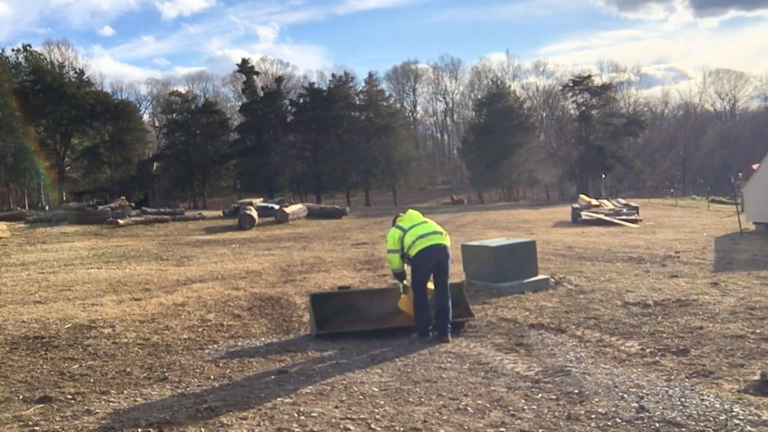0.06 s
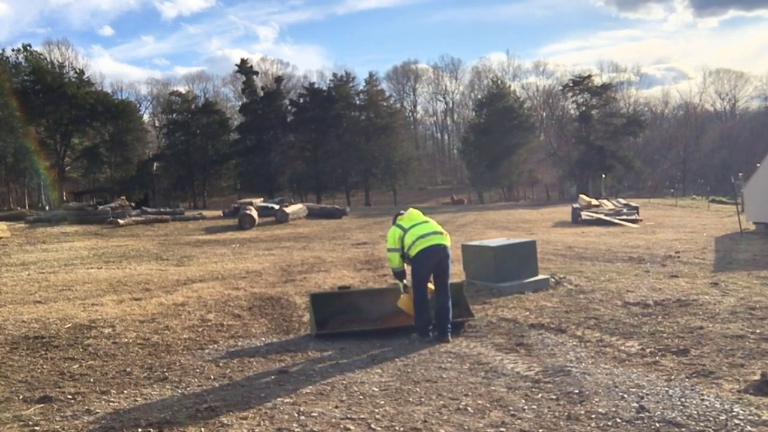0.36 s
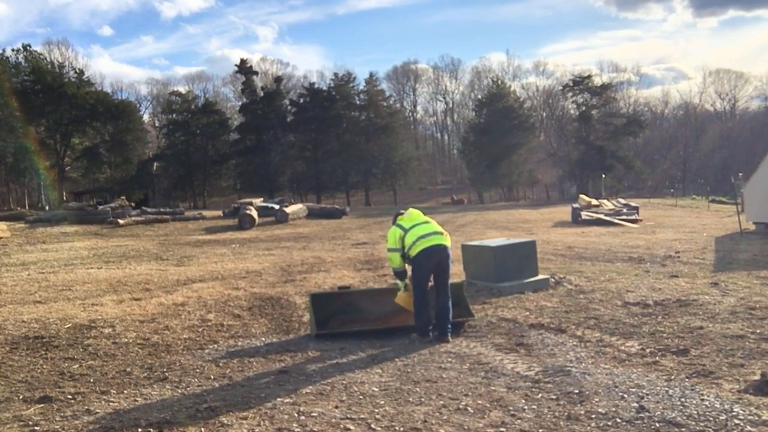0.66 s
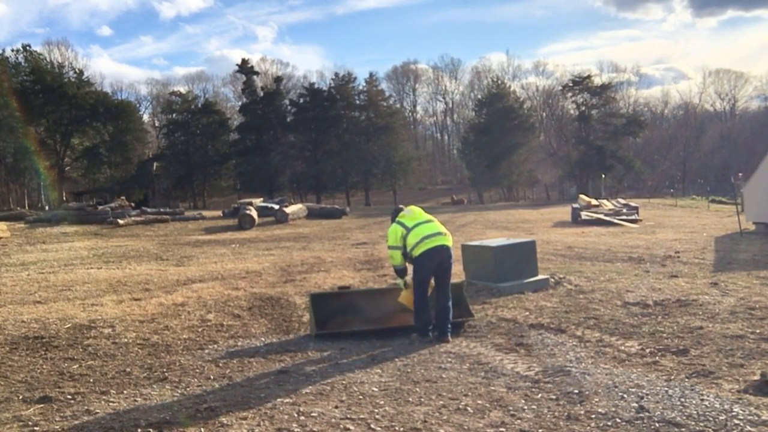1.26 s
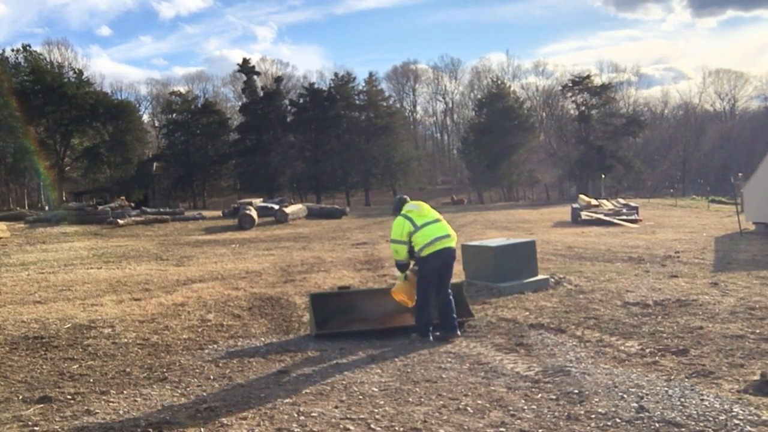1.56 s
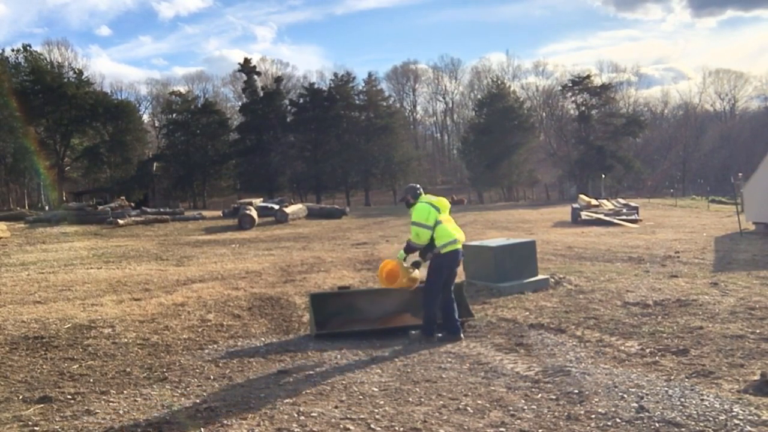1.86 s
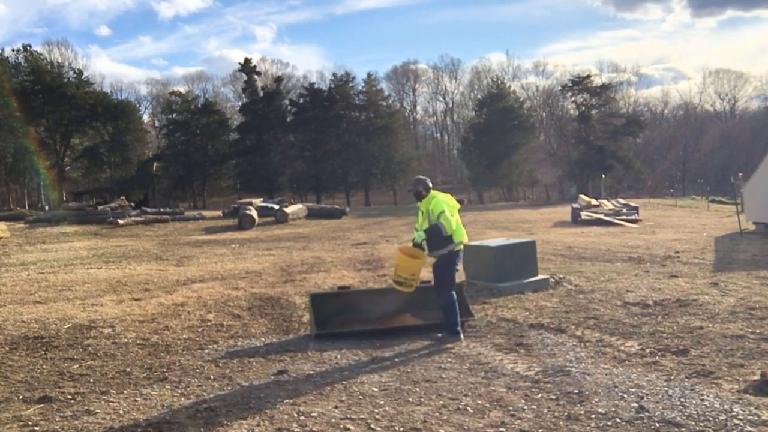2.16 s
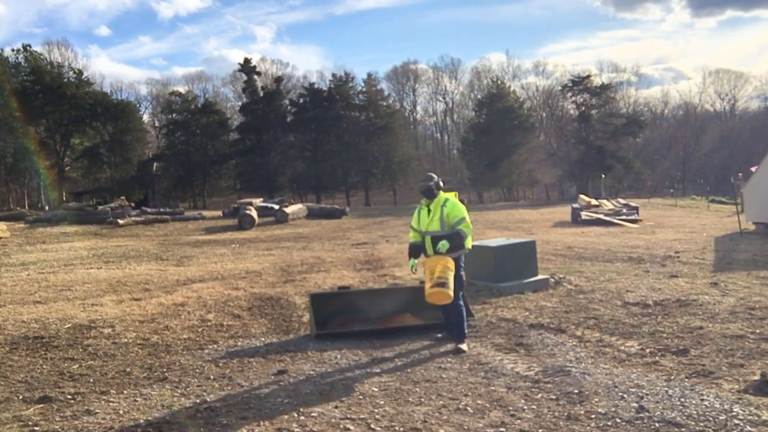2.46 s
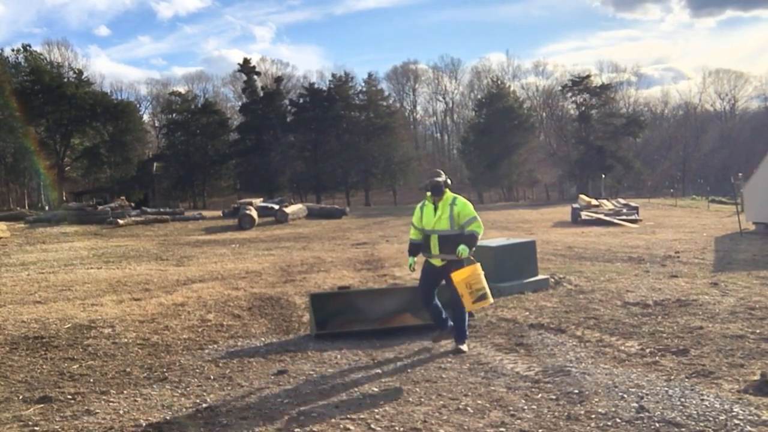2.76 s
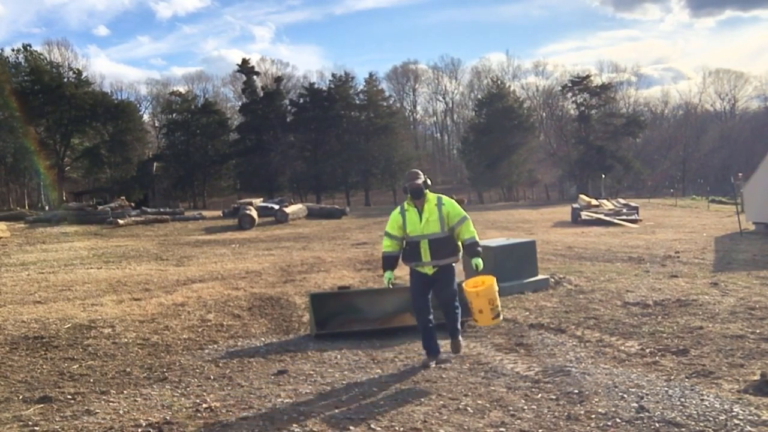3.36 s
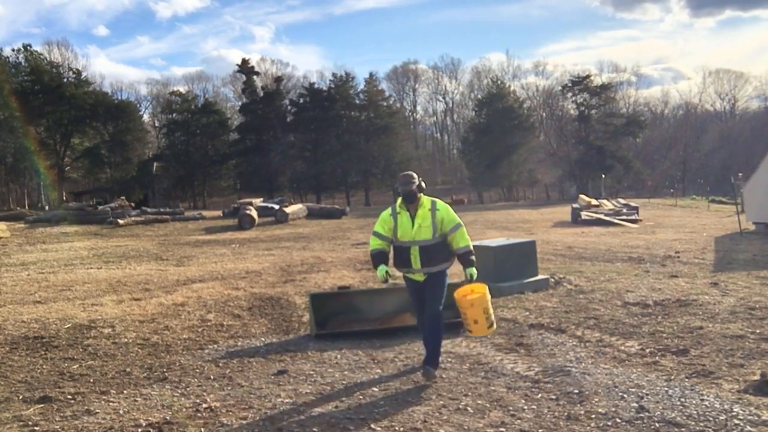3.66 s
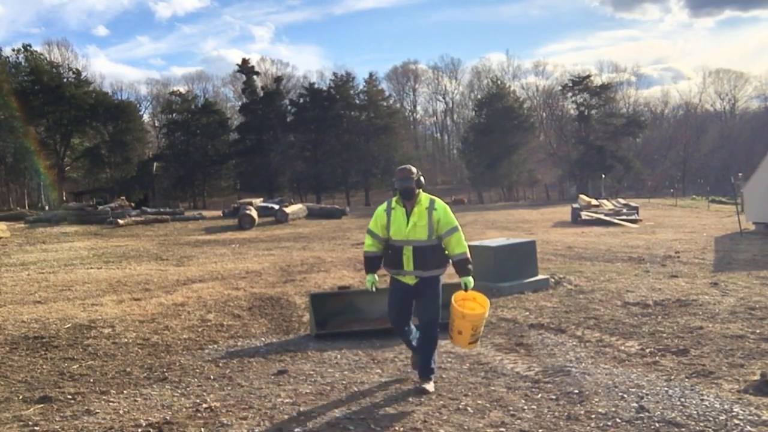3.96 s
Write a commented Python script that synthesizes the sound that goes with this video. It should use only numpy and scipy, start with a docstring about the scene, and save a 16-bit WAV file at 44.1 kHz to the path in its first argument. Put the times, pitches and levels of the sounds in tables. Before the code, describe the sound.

Four sharp knocks of a plastic bucket on a steel trough echo faintly outdoors while a gust thumps the microphone. The wind settles into a fluttering rumble, and boots scuff softly on grit as the bucket is carried away.

```python
"""An open yard, where a plastic bucket is knocked four times against a steel trough, then carried off.
Each knock makes the thin bucket wall click and clatter and the steel ring; far trees send back a faint
echo. Light taps and the scuff of boots on gritty ground follow. A gust buffets the microphone at first
and eases to a fluttering rumble, while the trees hiss in the distance."""
import sys
import numpy as np
from scipy import signal
from scipy.fft import rfft, irfft, next_fast_len
from scipy.io import wavfile
from scipy.ndimage import map_coordinates

SR = 44100
rng = np.random.default_rng(int(sys.argv[2]) if len(sys.argv) > 2 else 0)


def bounce(signal):
    """Save signal as a 16-bit WAV file at the path given by the first command-line argument."""
    frames = np.transpose(np.atleast_2d(signal))
    limited = np.clip(frames, -1, 1)
    pcm = np.round(limited * 32767).astype(np.int16)
    wavfile.write(sys.argv[1], SR, pcm)


N = 4 * SR


def amp(db):
    """Turn decibels into a number to multiply a sound by."""
    return 10 ** (np.asarray(db) / 20)


def unit(x):
    """Scale a sound to an average (rms) strength of 1."""
    return x / np.sqrt(np.mean(x ** 2) + 1e-20)


def along(points, hz):
    """Read between (frequency, value) points, spaced by octaves."""
    freqs, values = np.transpose(points)
    return np.interp(np.log(hz + 1), np.log(freqs + 1), values)


def curve(rows):
    """Join (time, value) points into one value per sample."""
    return np.interp(np.arange(N) / SR, *np.transpose(rows))


def wobble(rate):
    """A smooth curve through `rate` random values a second."""
    values = rng.standard_normal(int(N * rate / SR) + 4)
    return map_coordinates(values, [np.arange(N) * rate / SR])


def hump(hz, centre_hz, octaves):
    """A bell shape that favours the frequencies near centre_hz."""
    return np.exp(-.5 * (np.log2((hz + 1) / centre_hz) / octaves) ** 2)


def filtered(x, response):
    """Turn each frequency of x up or down by response(hz)."""
    size = next_fast_len(len(x) + SR // 10)
    return irfft(rfft(x, size) * response(np.fft.rfftfreq(size, 1 / SR)), size)[:len(x)]


def noise(response, size=N):
    """Noise of strength 1, with its tone shaped by response(hz)."""
    return unit(filtered(rng.standard_normal(size), response))


def dying(t, t60):
    """Die away by 60 dB in t60 seconds, the fade time."""
    return np.exp(-np.log(1000) * t / t60)


def fading(x, t60s):
    """Let each frequency of x die away with its own fade time."""
    hz, t, spectrum = signal.stft(x, SR, nperseg=256)
    decay = amp(-60 * t / along(t60s, hz)[:, None])
    return signal.istft(spectrum * decay, SR, nperseg=256)[1][:len(x)]


def add(out, start, x):
    """Mix x into out, beginning at `start` seconds."""
    part = out[max(round(start * SR), 0):][:len(x)]
    part += x[:len(part)]


def swelling(rows, octaves):
    """Bands of noise that swell and sink, each around its own moment and pitch."""
    out, t = np.zeros(N), np.arange(-SR // 5, SR // 5) / SR
    for when, db, hz, width in rows:
        bell = np.exp(-.5 * (t / width) ** 2)
        band = noise(lambda f: hump(f, hz, octaves), len(t))
        burst = unit(bell * band) * np.sqrt(np.mean(bell ** 2))
        add(out, when + t[0], amp(db) * burst[t >= -when])
    return out


def tree_hiss():
    """Distant trees give a soft, almost steady hiss."""
    # tone of the hiss (frequency [Hz], relative level [dB])
    tone = [(290, -26.5), (500, 2), (792, -6), (851, -6), (954, -5.5), (1220, -6.5), (1310, -9.5),
            (1580, -10), (2260, -18.5), (3010, -18), (15500, -40.5)]
    return noise(lambda hz: amp(along(tone, hz))) * amp(-72 + .34 * wobble(3.7))


def wind():
    """Wind on the microphone rumbles and buffets; the stronger it is, the brighter, until it tears."""
    # strength of the deep rumble and of the buffeting above it (time [s], level [dB])
    rumble_levels = [(0.0, -40.5), (0.19, -34.5), (0.23, -41), (0.27, -33), (0.48, -43), (0.49, -40.5),
                     (1.01, -46.5), (1.04, -40), (1.18, -47), (1.2, -41), (1.34, -46.5), (1.38, -51),
                     (1.47, -42), (1.64, -54.5), (1.67, -42), (1.7, -64), (1.78, -33.5), (1.84, -57.5),
                     (1.87, -38), (1.9, -56), (1.98, -47), (2.07, -49.5), (2.37, -44), (2.38, -57),
                     (2.46, -42), (2.48, -49.5), (2.61, -60), (2.71, -46), (2.75, -68), (2.77, -46),
                     (2.86, -65), (3.06, -44.5), (3.22, -43.5), (3.25, -58), (3.29, -47), (3.33, -54),
                     (3.48, -47.5), (3.5, -58), (3.62, -40.5), (3.7, -57), (3.73, -45.5), (3.81, -61),
                     (3.92, -45.5), (4.0, -54)]
    buffet_levels = [(0, -48.5), (.02, -32), (.075, -38), (.11, -32.5), (.16, -29.5), (.19, -28),
                     (.22, -36.5), (.262, -30.5), (.295, -34.5), (.325, -29), (.35, -32.5), (.4, -34),
                     (.445, -36.5), (.47, -44.5), (.49, -40), (.56, -42), (.61, -48), (.64, -39),
                     (.68, -45.5), (.72, -49), (.755, -47.5), (.78, -41.5), (.79, -39), (.825, -53.5),
                     (.85, -62), (.95, -56.5), (1.07, -46), (1.14, -62.5), (1.19, -45), (1.27, -52.5),
                     (1.33, -60.5), (1.43, -46), (1.49, -57.5), (1.54, -56), (1.63, -63.5), (1.66, -46),
                     (1.73, -51), (1.81, -68.5), (2, -60.5), (2.3, -64.5), (2.55, -69.5), (2.9, -70.5),
                     (3, -56), (3.09, -56.5), (3.17, -53.5), (3.23, -66), (3.3, -57.5), (3.41, -59),
                     (3.5, -65), (3.53, -53), (3.61, -49), (3.69, -49), (3.78, -62.5), (3.86, -67.5),
                     (3.9, -50), (3.95, -66), (4, -76)]
    # tones of the four wind noises (frequency [Hz], relative level [dB])
    rumble_tone = [(20, -28.5), (32, -4), (45, -4.5), (60, 1.5), (90, -3.5), (130, -10.5), (200, -20.5),
                   (400, -49.5), (900, -88.5)]
    gust_tone = [(40, -23), (100, -2), (170, 6.5), (300, 1.5), (450, -5), (650, -11.5), (900, -33),
                 (1300, -45), (2200, -70), (5000, -71)]
    breeze_tone = [(50, -15), (120, -2), (190, 0), (300, -5), (430, -12), (600, -23), (850, -42),
                   (1500, -70), (4000, -100)]
    tear_tone = [(300, -20.5), (700, -1.5), (1000, -7), (1400, -16), (2200, -31), (5000, -60)]
    gust_from_db, gust_full_db, gust_eases_s = -53.5, -31.5, 1.7
    level_db, t = curve(buffet_levels), np.arange(N) / SR
    rumble = noise(lambda hz: amp(along(rumble_tone, hz)))
    rumble *= amp(curve(rumble_levels) + .5 + 1.16 * wobble(18))
    gust_share = np.clip((level_db - gust_from_db) / (gust_full_db - gust_from_db), 0, 1)
    gust_share *= np.exp(-(t / gust_eases_s) ** 2)  # duller as the gust passes
    gust = noise(lambda hz: amp(along(gust_tone, hz)))
    breeze = noise(lambda hz: amp(along(breeze_tone, hz)))
    buffet = (np.sqrt(gust_share) * gust + np.sqrt(1 - gust_share) * breeze) * amp(level_db - 1)
    flutter = unit(amp(3.5 * wobble(70)))
    tear_db = gust_full_db - 21 + 2.7 * (level_db - gust_full_db)  # grows faster than the buffeting
    tear = noise(lambda hz: amp(along(tear_tone, hz))) * amp(tear_db)
    return rumble + flutter * (buffet + tear)


def whooshes():
    """The wind swells in brief whooshes."""
    # whooshes (time [s], level [dB], pitch [Hz], half length [s])
    swells = [(.017, -32.5, 400, 0.0086), (.056, -36, 374, 0.012), (.095, -43.5, 443, 0.009),
              (.165, -34, 427, 0.015), (.264, -32.5, 523, .004), (.3245, -28.5, 526, .004),
              (.447, -34, 405, .011), (.487, -36.5, 406, 0.0051), (.53, -41.5, 385, 0.005),
              (.581, -38, 390, 0.0059), (.637, -39, 437, 0.0047), (.66, -44.5, 365, 0.0061),
              (.792, -45, 400, 0.0085), (.822, -45, 405, 0.0061), (1.197, -48, 485, 0.0043),
              (1.262, -54.5, 480, 0.0053), (1.655, -56, 453, 0.0094), (3.087, -58, 446, 0.012),
              (3.605, -55.5, 400, 0.0047), (3.645, -56, 400, 0.0042)]
    return swelling(swells, octaves=.37)


def eddies():
    """Small whirls of air thump the microphone, each with one swing of pressure; strong ones are steeper."""
    # passing whirls (time [s], relative level [dB], pitch [Hz])
    whirls = [(0.135, -11.5, 233), (0.143, -14.5, 200), (0.16, -16.5, 335), (0.169, -21, 305),
              (0.1831, -17.5, 220), (0.2587, -27, 198), (.264, -13, 332), (0.266, -22.5, 218),
              (0.3236, -16, 257), (0.3274, -16, 200), (.336, -21.5, 182.6), (.459, -31.5, 373),
              (.486, -25, 259), (0.581, -17, 200), (.687, -23, 190), (.783, -33, 373), (0.824, -27, 220),
              (.89, -40, 81.4), (1.036, -28, 75), (1.061, -33.5, 177), (1.197, -29, 292), (1.261, -34, 367),
              (1.309, -30.5, 98), (1.448, -33, 159), (1.472, -31, 110), (1.488, -28, 79), (1.66, -36, 302),
              (1.698, -35.5, 300), (1.729, -29.5, 175.6), (1.779, -30, 68), (1.866, -37, 130),
              (2.302, -37.5, 212), (2.456, -32, 78), (2.666, -39, 114), (3.085, -37.5, 214),
              (3.286, -38.5, 171), (3.461, -32, 93), (3.53, -37.5, 216), (3.606, -30, 200),
              (3.674, -38, 255), (3.627, -32, 91), (3.921, -34, 153)]
    out, t = np.zeros(N), np.arange(N) / SR
    for (when, db, hz), phase in zip(whirls, rng.random(len(whirls))):
        near = np.abs(t - when) * hz < 10
        smoothness = 2.94 * np.exp(-.022 * (db + 30))
        passage = 2 * np.pi * hz * (t[near] - when) / smoothness
        swing = np.exp(2j * np.pi * phase) / (1 - 1j * passage) ** (smoothness + 1)
        out[near] += amp(db - 4) * swing.real
    return out


def scrapes():
    """Faint, hollow scrapes come with the walking."""
    # scrapes (time [s], level [dB], pitch [Hz], half length [s])
    swells = [(3.08, -67.5, 1270, .04), (2.7, -74.5, 1400, .04), (4.3, -74, 1450, .035)]
    return swelling(swells, octaves=.2)


def carrying():
    """Short taps and longer gritty scuffs as the bucket is carried away; distance dulls them."""
    # taps of bucket and handle, crunches underfoot (time [s], level [dB], pitch [Hz], fade time [s])
    taps = [(1.217, -59.5, 1700, 0.1), (1.466, -60.5, 1400, 0.15), (1.502, -59.5, 1170, 0.16),
            (1.548, -53, 1450, 0.027), (1.7408, -66.5, 3600, 0.025), (1.766, -65, 1800, 0.077),
            (2.206, -70, 3800, 0.13), (2.596, -69.5, 2790, 0.039), (3.056, -63.5, 1200, 0.15),
            (3.112, -79, 2000, 0.04), (3.174, -60.5, 1440, 0.037), (3.361, -67, 1660, 0.025),
            (3.394, -71, 1700, 0.036), (3.697, -61.5, 1480, 0.059), (3.710, -67.5, 1690, 0.12),
            (3.778, -63, 2060, .05), (3.791, -65, 2140, 0.031), (3.9665, -63, 1660, 0.029),
            (3.983, -63, 1800, 0.041)]
    # scuffs of boots and clothing (time [s], level [dB], pitch [Hz], rise time [s], fade time [s])
    scuffs = [(1.41, -67, 1500, 0.011, 1.74), (1.531, -71.5, 4500, 0.039, 1.05),
              (2.2, -71, 3600, 0.0028, 0.17), (2.205, -65, 1950, 0.015, 0.63),
              (2.331, -67.5, 1300, 0.047, 1.16), (3.02, -71, 1170, 0.02, 1.8),
              (3.034, -82.5, 5500, 0.0072, 1.9), (3.489, -73.5, 3820, 0.01, 0.66),
              (3.699, -66, 1490, 0.034, 0.48), (3.77, -73.5, 5200, 0.041, 1.2), (3.94, -72, 5560, .03, 1.2)]
    out, t, dull_hz = np.zeros(N), np.arange(SR) / SR, 8000

    def rustle(hz, octaves):
        """One second of soft-edged noise around a pitch."""
        return noise(lambda f: hump(f, hz, octaves) / np.sqrt(f + 1) / (1 + (f / dull_hz) ** 4), SR)

    for start, db, hz, t60 in taps:
        add(out, start, amp(db) * rustle(hz, octaves=.75) * dying(t, t60))
    for start, db, hz, rise, t60 in scuffs:
        grit = unit(rustle(hz, octaves=1) * amp(2 * wobble(250)[:SR]))
        add(out, start, amp(db) * grit * (1 - np.exp(-t / rise)) * dying(t, t60))
    return out


def tree_echo(x):
    """The trees send back a faint echo in which low notes last longest."""
    # how long the echo lasts (frequency [Hz], fade time [s])
    fade_times = [(500, 2.4), (2000, .4), (6000, .74), (12000, .42)]
    tail = fading(noise(lambda hz: 1 / (1 + hz / 8000), SR), fade_times)
    return amp(-23) * signal.fftconvolve(x, tail / np.linalg.norm(tail))[:N]


def bucket_knocks():
    """The bucket wall clicks and clatters and the steel rings; the spot that is struck colours the tone."""
    # contacts of bucket and trough, several each in the last two knocks (time [s], level [dB],
    # treble boost [dB], upper limit [Hz], tail boost [dB], five pitches the struck spot favours [Hz])
    contacts = [(.1352, -32.5, 3, 19000, -1, 1700, 1960, 3100, 3230, 3830),
                (.5555, -39, -6, 9500, -4, 1380, 1590, 2020, 3170, 3490),
                (.9412, -41, -3, 17000, -1, 1030, 1560, 2780, 3470, 4300),
                (.945, -33.5, 0, 17000, -1.5, 1030, 1230, 1580, 2080, 2250),
                (1.3446, -31.5, 1, 19000, 0, 1520, 1670, 2700, 2940, 4260),
                (1.351, -36.5, 1, 17000, 0, 1370, 1700, 2190, 3200, 3490),
                (1.3685, -40.5, 0, 15000, 0, 1025, 1510, 1800, 2840, 3490)]
    # notes the steel trough rings at (pitch [Hz], relative level [dB], fade time [s])
    trough_notes = [(931, -5, .2), (1025, -6, .3), (1230, -4, .18), (1375, -5, .18), (1513, -3, .2),
                    (1582, -2, .2), (1680, -1, .2), (1801, -2, .2), (2184, -3, .16), (2700, -1, .19),
                    (2841, -2, .22), (3172, -1, .19), (3490, -2, .19), (4266, -4, .14)]
    # tone of the clatter of bucket wall and steel (frequency [Hz], relative level [dB])
    clatter_tone = [(150, -19.5), (450, -6.5), (800, -7.5), (1100, -4.5), (1700, 2), (2450, -5), (3200, -3),
                    (4300, -9), (4850, -15), (6800, -17), (9000, -30), (12000, -31), (15500, -27.5)]
    # how long the clatter lasts (frequency [Hz], fade time [s])
    clatter_fades = [(600, 0.4), (1800, 0.12), (4000, 0.15), (8000, 0.15), (14000, 0.043)]
    click_hz, rise_s = 2300, .0006
    lowest_hz = 750  # thin walls give out little sound below this
    out, t = np.zeros(N), np.arange(SR // 2) / SR
    sine = lambda hz: np.sin(2 * np.pi * (hz * t + rng.random()))
    for start, db, treble_db, top_hz, tail_db, *favoured_hz in contacts:
        def colour(hz, spot_db):
            """This contact's tone, with the favoured pitches lifted by spot_db."""
            treble = amp(treble_db * along([(3000, .047), (10000, 1)], hz))
            spot = amp(spot_db * sum(hump(hz, f, octaves=.044) for f in favoured_hz))
            return treble * spot / np.sqrt(1 + (hz / top_hz) ** 10 + (lowest_hz / (hz + 1)) ** 4)

        hit_colour = lambda hz: colour(hz, spot_db=7)
        tail_colour = lambda hz: colour(hz, spot_db=2.1)
        crack = noise(lambda hz: amp(along(clatter_tone, hz)) * hit_colour(hz), len(t))
        click = noise(lambda hz: hump(hz, click_hz, octaves=1.2) * hit_colour(hz), len(t))
        clatter = noise(lambda hz: amp(along(clatter_tone, hz)) * tail_colour(hz), len(t))
        ring = sum(amp(level + rng.normal(0, .67)) * tail_colour(hz) * dying(t, t60) * sine(hz)
                   for hz, level, t60 in trough_notes)
        clack = sum(amp(-np.log2(hz / click_hz)) * sine(hz) for hz in favoured_hz)  # -1 dB per octave
        hit = amp(-2) * click * dying(t, t60=.017)
        hit += amp(-3.5) * crack * dying(t, t60=.042)
        hit += amp(-6.5) * clack * dying(t, t60=.052)
        tail = amp(-6.5) * fading(clatter, clatter_fades) + amp(-24.5) * ring
        add(out, start, amp(db) * (1 - np.exp(-t / rise_s)) * (hit + amp(tail_db) * tail))
    return out


def scene():
    """Mix the knocks and their echo with the walking, the wind and the trees, in one channel."""
    knocks = bucket_knocks()
    walking = carrying() + scrapes()
    buffeting = wind() + whooshes() + eddies()
    return (knocks + tree_echo(knocks) + walking + buffeting + tree_hiss())[None]


def record(dry):
    """The sound fades in quickly; the camera cuts the deepest bass and the highest treble."""
    fade_in_s, low_cut_hz, top_hz = .008, 33, 15800
    faded_in = dry[0] * np.minimum(np.arange(N) / SR / fade_in_s, 1)
    return filtered(faded_in, lambda hz: (hz < top_hz) / np.sqrt(1 + (low_cut_hz / (hz + 1)) ** 8))[None]


dry = scene()
out = record(dry)
bounce(out)
```